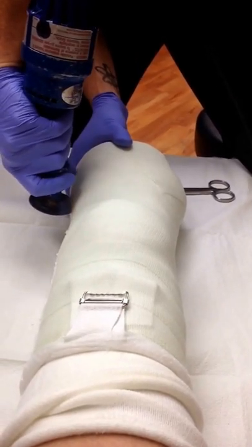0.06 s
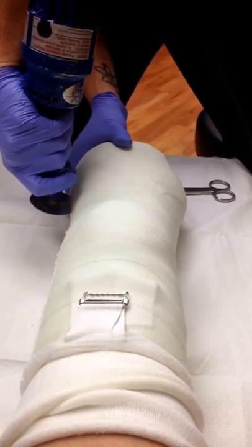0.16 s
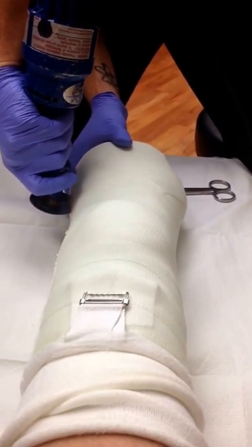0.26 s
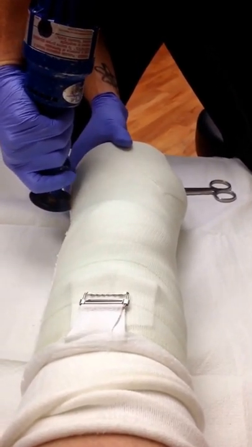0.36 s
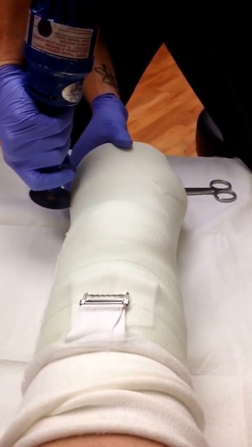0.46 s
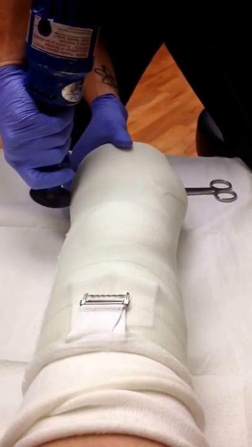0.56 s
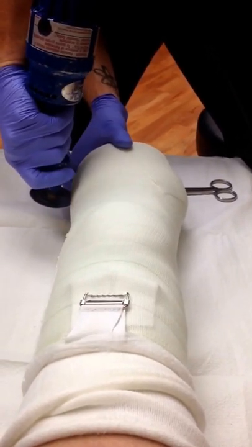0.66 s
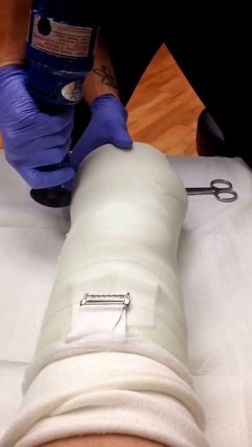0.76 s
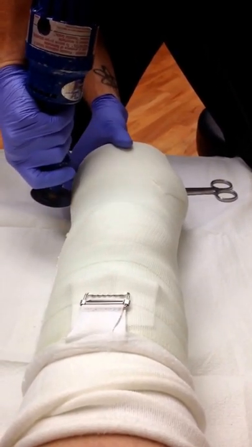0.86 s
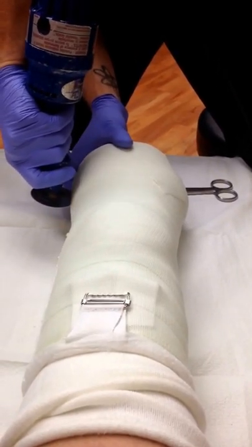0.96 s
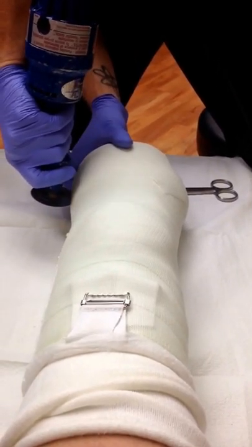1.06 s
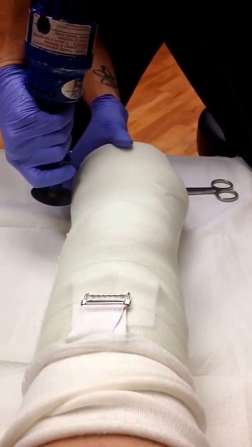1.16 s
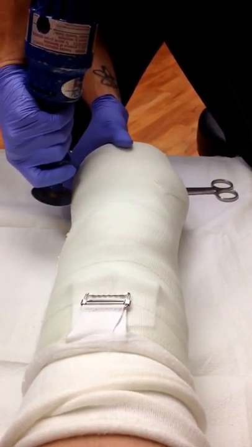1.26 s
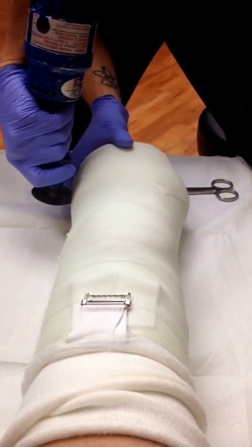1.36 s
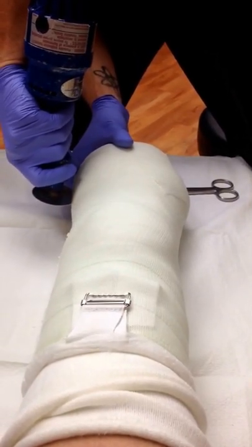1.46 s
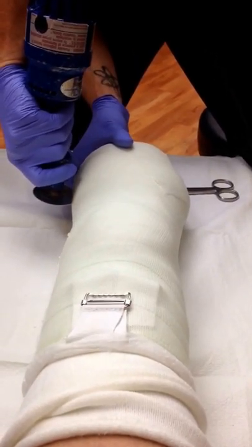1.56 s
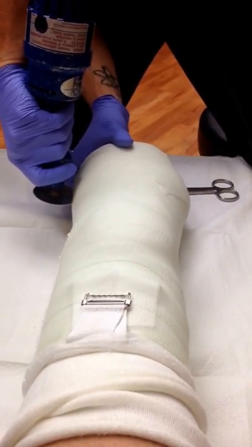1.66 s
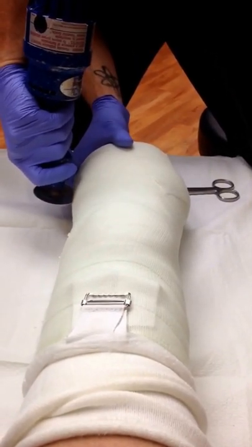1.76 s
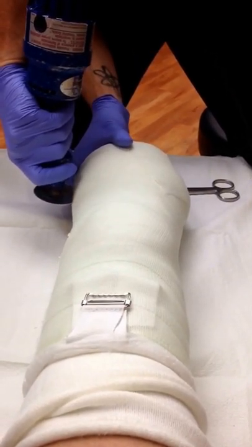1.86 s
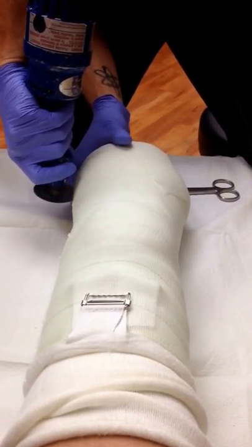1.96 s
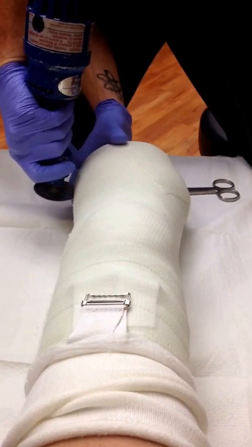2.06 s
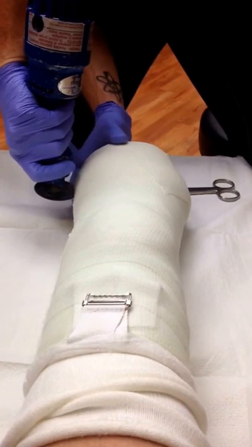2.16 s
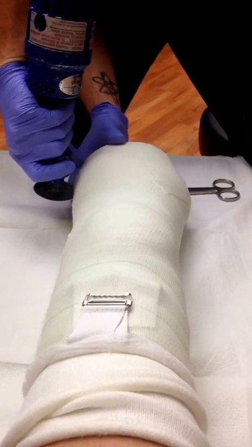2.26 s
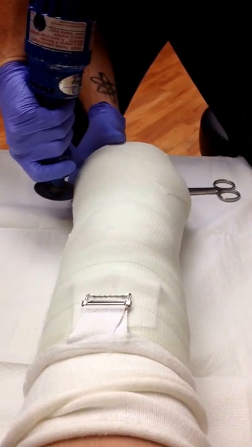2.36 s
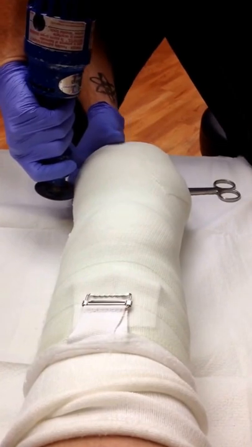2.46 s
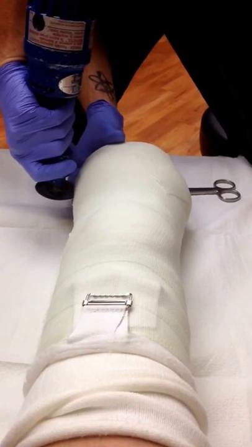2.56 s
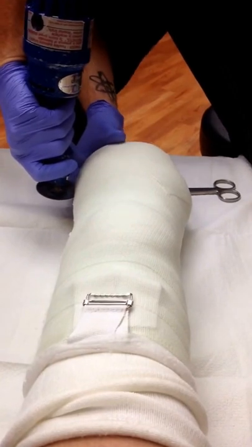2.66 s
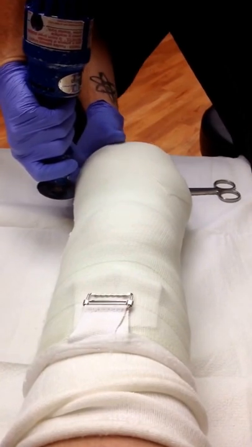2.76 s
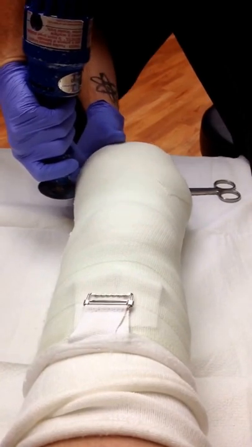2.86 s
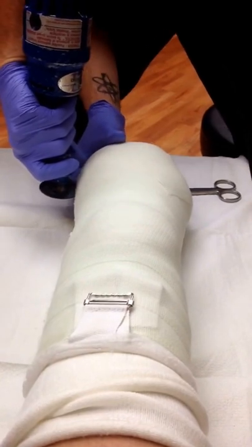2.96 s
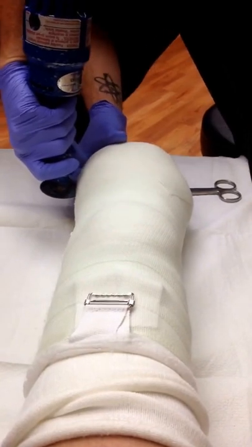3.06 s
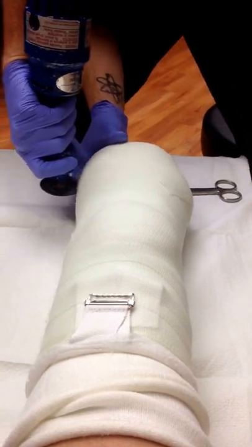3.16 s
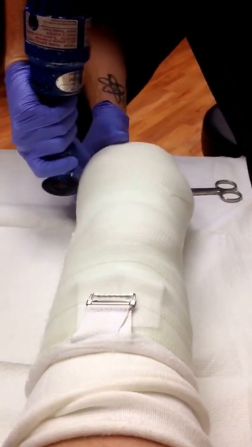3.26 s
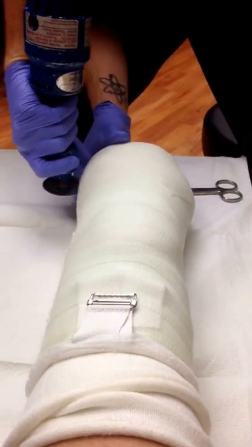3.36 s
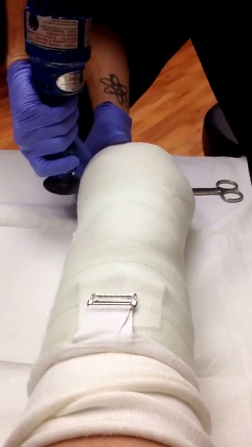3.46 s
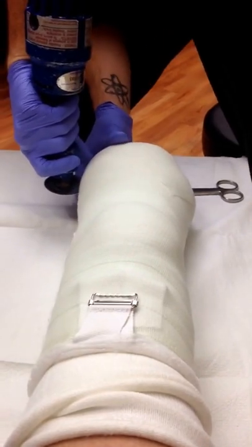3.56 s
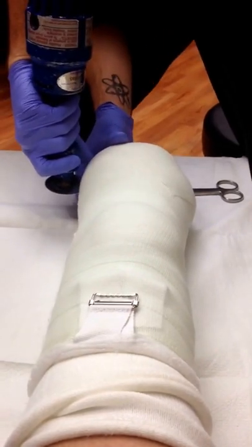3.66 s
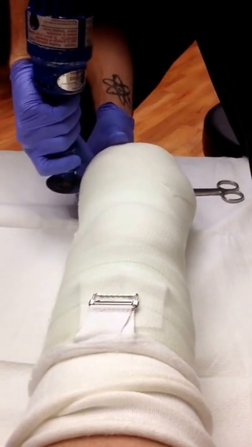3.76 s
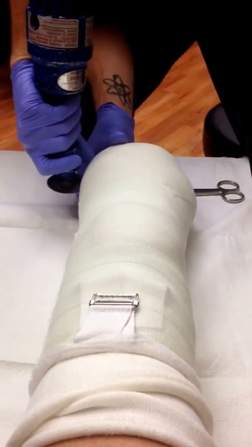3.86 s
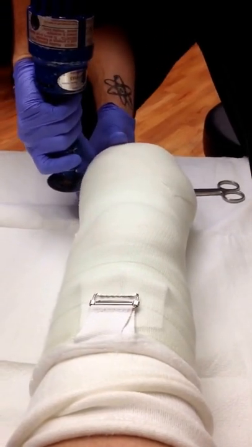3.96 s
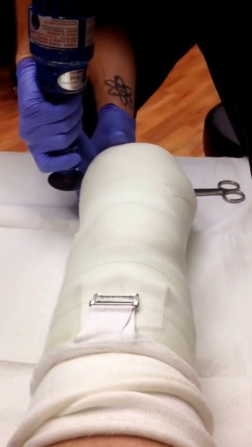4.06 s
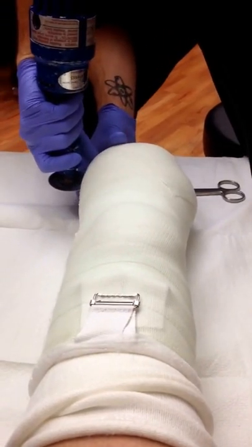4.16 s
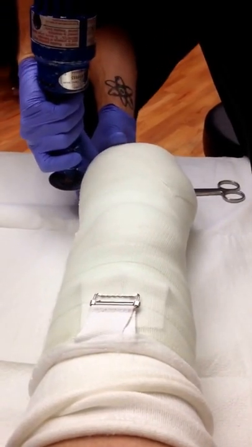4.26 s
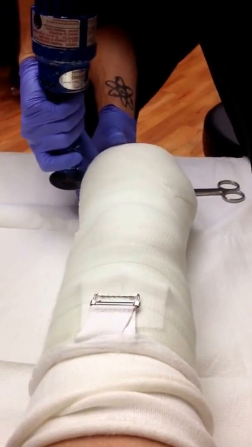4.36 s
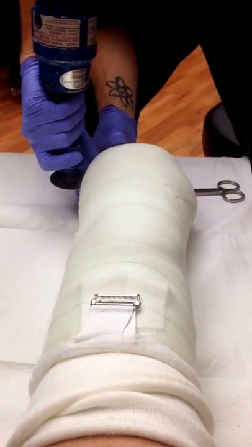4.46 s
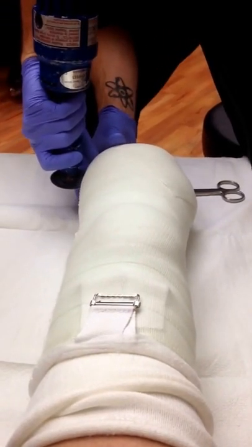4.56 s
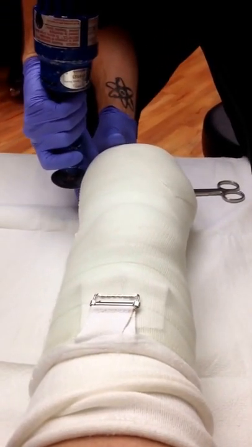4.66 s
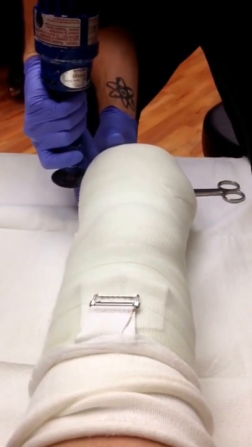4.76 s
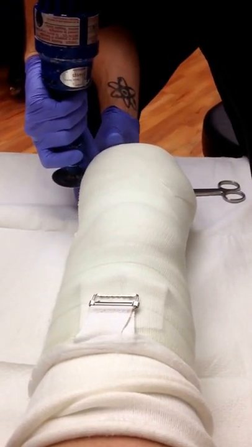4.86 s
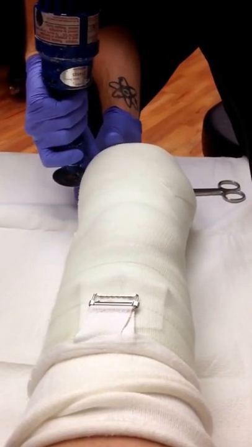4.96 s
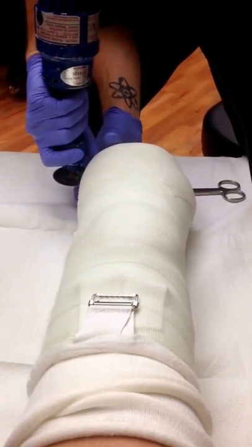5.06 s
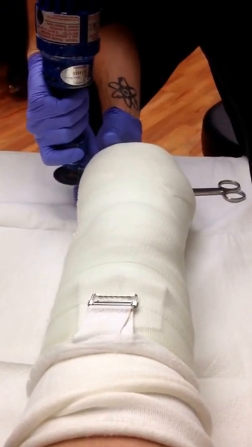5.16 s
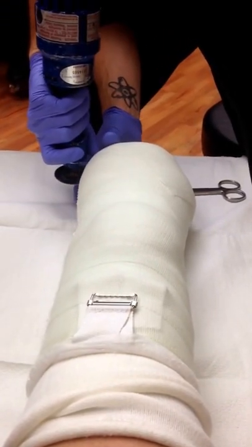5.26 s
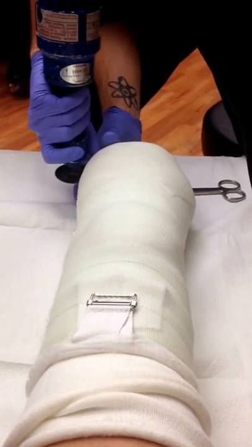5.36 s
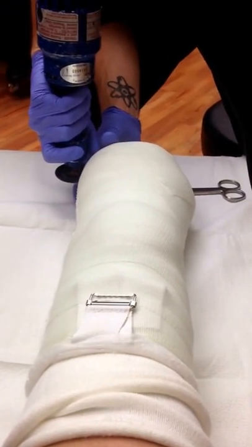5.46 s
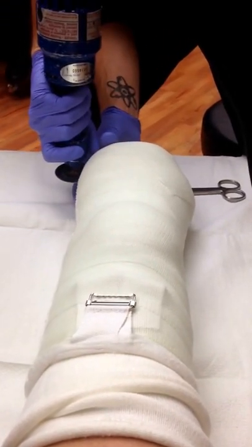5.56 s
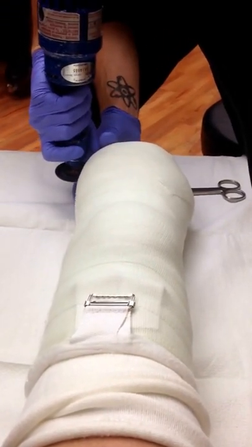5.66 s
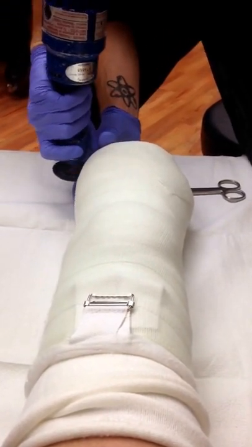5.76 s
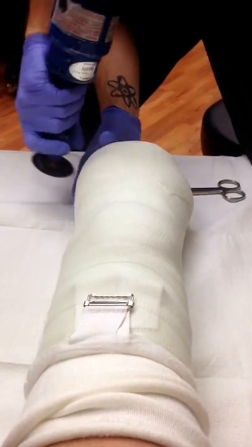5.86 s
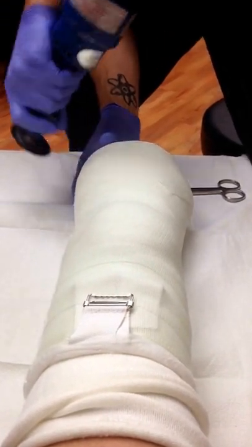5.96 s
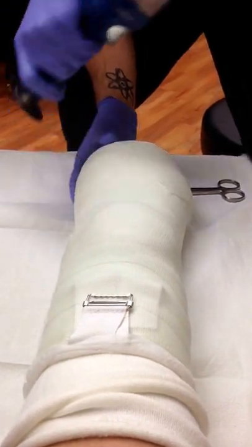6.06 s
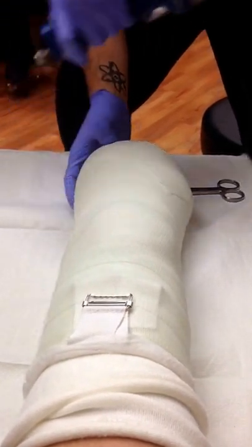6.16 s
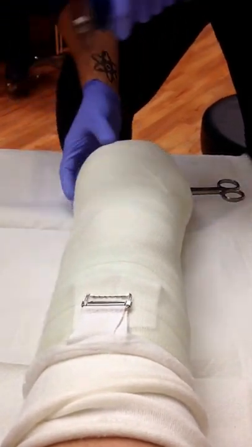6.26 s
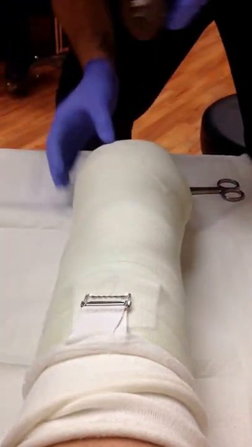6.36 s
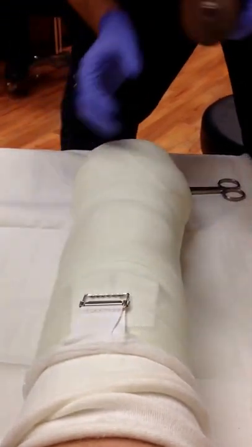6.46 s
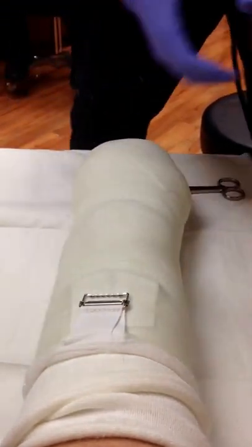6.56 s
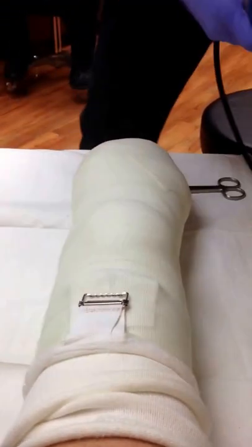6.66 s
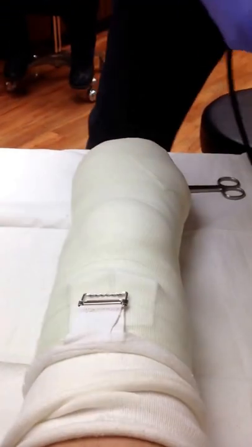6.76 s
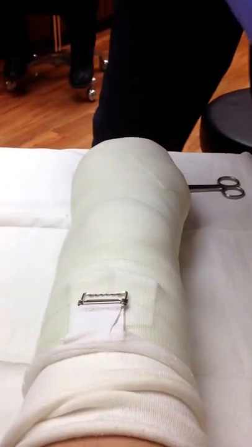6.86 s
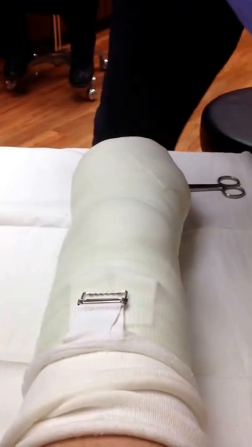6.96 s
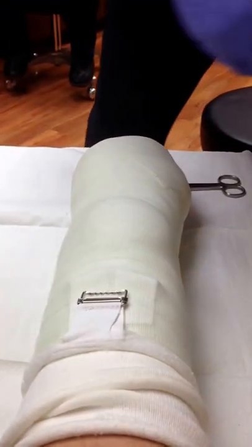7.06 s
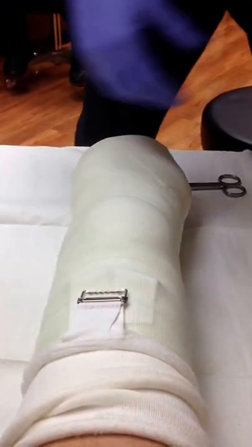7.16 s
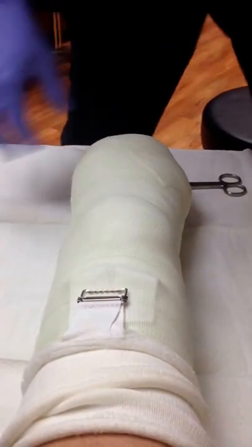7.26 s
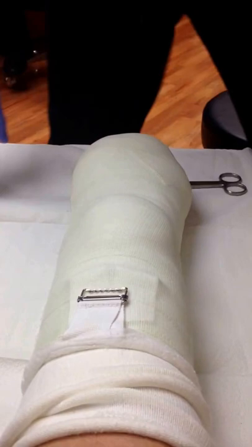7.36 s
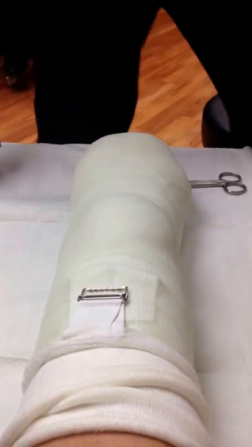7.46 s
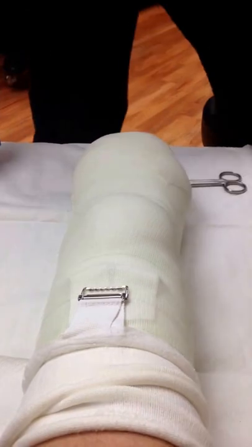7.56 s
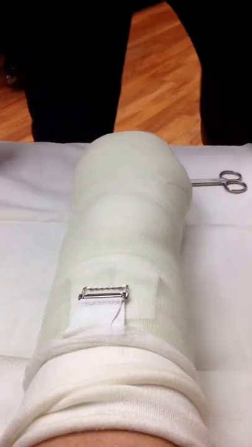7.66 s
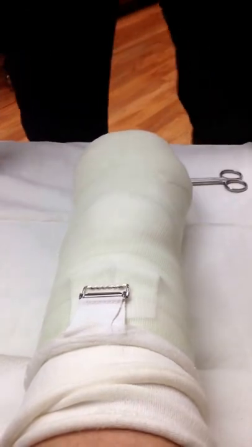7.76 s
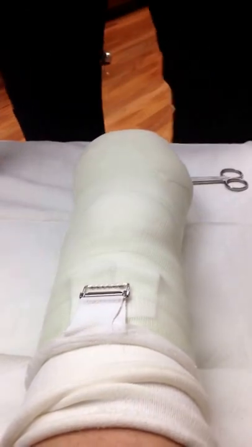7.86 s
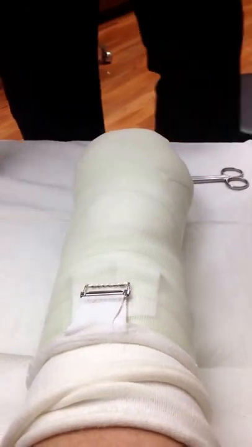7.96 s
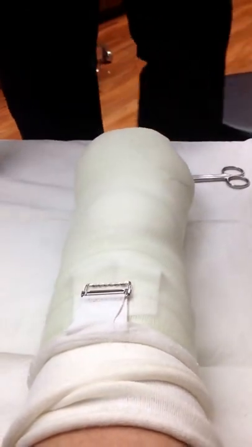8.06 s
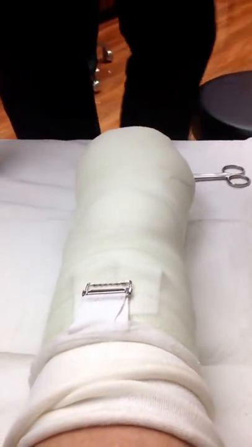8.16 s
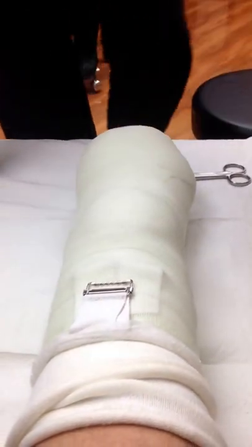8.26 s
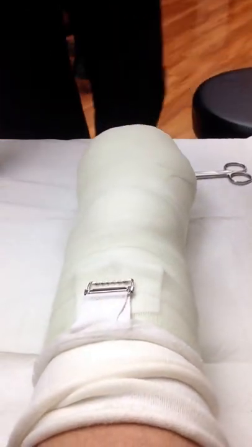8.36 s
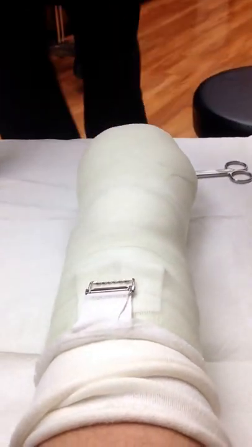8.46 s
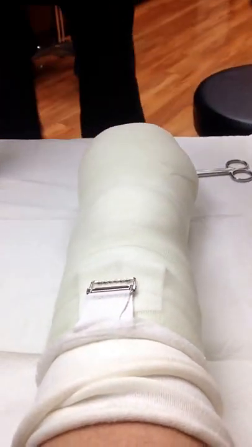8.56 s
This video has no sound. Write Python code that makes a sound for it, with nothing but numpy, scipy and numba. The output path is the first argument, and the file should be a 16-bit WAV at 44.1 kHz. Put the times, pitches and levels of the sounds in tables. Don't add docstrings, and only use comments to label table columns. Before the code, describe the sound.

The sound starts mid-cut, with an electric oscillating saw close to the microphone in a small room. From 0 to about 1 second the harsh, rattling buzz sags in pitch as the blade bites, and the hard cast booms hollowly beneath it. From 1 to 5.8 seconds it grinds on, pitch wavering slightly down and up, with gritty hiss and fine casing rattle. Brief slips near 2.1, 3.3 and 4.1 seconds weaken the boom; short snags near 0.9 and 4.6 make the whine flare. At about 5.8 the blade lifts out: pitch sweeps up within half a second, the low boom drops away, and a brighter whine emerges. From 6.2 to the end at about 8.6 seconds it runs free, nearly steady, with fan hiss and metallic ringing that surges and fades. Faint low thuds fall around 6.4 to 7, 7.75 and 8.4 seconds, over barely audible mains hum.

```python
import sys
import numpy as np
from scipy import signal
from scipy.fft import rfft, irfft, next_fast_len
from scipy.io import wavfile
from scipy.ndimage import uniform_filter1d
from numba import njit

SR = 44100
rng = np.random.default_rng(int(sys.argv[2]) if len(sys.argv) > 2 else 0)


def pcm_store(signal):
    levels = np.round(np.clip(np.atleast_2d(signal), -1, 1) * 32767)
    wavfile.write(sys.argv[1], SR, levels.astype(np.int16).T)


def volts_from_db(level):
    exponent = np.asarray(level, float) / 20
    return 10 ** exponent


N = 379242
T = np.arange(N) / SR
C = T[::32]

# [t/s, f/Hz]
LOADED = [(0.0, 270.8), (0.31, 258.5), (0.49, 264), (0.7, 259), (1.1, 239), (1.59, 230.8), (1.93, 232.1),
          (2.28, 248.5), (2.68, 248), (2.88, 243), (3.15, 230.6), (3.37, 235.9), (3.95, 236), (4.29, 247.2),
          (4.88, 248.4), (5.34, 244), (5.58, 246.5), (5.84, 256.6)]
LIFT_S, IDLE_HZ, RUN_UP_S, CREEP_S, CREEP_SHARE = 5.84, 317.6, .34, 1.4, .055
# [t/s, pressure on cast level/dB, housing level/dB]
GRIP = [(0, -3.5, -22), (.3, 0.5, -20.5), (.9, 1, -20.5), (1.2, -2, -20), (1.55, -1.5, -20.5),
        (2, -5, -21.5), (2.35, -4.5, -18.5), (3.2, -3.5, -20.5), (3.9, -10, -22.5), (4.3, -1.5, -19),
        (5, 0.5, -19), (5.4, -2, -17), (5.8, -1, -18.5), (6.3, -1, -18.5), (6.9, 4, -23.5), (7.5, 6, -19),
        (8.2, 4, -18), (8.6, 2.5, -21.5)]
# [order, level/dB]
BITE = [(1, -4), (2, -4), (3, -3), (4, -1.5), (5, -4.5), (6, -11), (7, -5.5), (8, -2), (9, -0.5), (10, 0),
        (11, -2), (12, -1.5), (13, -17), (14, -4), (15, -10), (16, -6), (17, -19), (18, -21), (19, -23),
        (20, -19), (21, -13), (22, -23), (23, -32), (24, -11)]
# [order, level/dB]
LONG_CUT = [(1, 2.5), (2, -2), (3, 0), (4, -4.5), (5, -6), (6, -5.5), (7, -3), (8, -3.5), (9, -3.5),
            (10, -2), (11, -5), (12, -3.5), (13, -5), (14, -6), (15, -3), (16, -7), (17, -9), (18, -6.5),
            (19, -11.5), (20, -26.5), (21, -12.5), (22, -28), (23, -8), (24, -14)]
# [order, level/dB]
LAST_CUT = [(1, -5.5), (2, -7), (3, 4), (4, -6), (5, -8), (6, -8), (7, -2), (8, -6.5), (9, -3.5),
            (10, -0.5), (11, -6.5), (12, -14.5), (13, -9.5), (14, -12), (15, -9), (16, -10), (17, -8.5),
            (18, -14), (19, -17.5), (20, -25), (21, -13), (22, -11.5), (23, -18), (24, -53)]
# [order, level/dB]
RUN_UP = [(1, -24.5), (2, -27), (3, -9.5), (4, -14.5), (5, -6), (6, -6.5), (7, -8.5), (8, -11.5), (9, -5),
          (10, -7.5), (11, -3), (12, -5), (13, -2), (14, -7), (15, -3.5), (16, -10), (17, 0), (18, -38.5),
          (19, -18), (20, -7), (21, -7), (22, -29), (23, -3), (24, -8)]
# [order, level/dB]
FREE = [(1, -19), (2, -22.5), (3, -9), (4, -10.5), (5, -3), (6, -8.5), (7, -4), (8, -9.5), (9, 0.5),
        (10, -4.5), (11, -6.5), (12, -9.5), (13, -3), (14, -6), (15, 0.5), (16, -5), (17, -7), (18, -10),
        (19, -17), (20, -8), (21, -18), (22, -3), (23, -25), (24, -41)]
# [start t/s, end t/s]
CHANGES = [
    (.7, 0.97),
    (4.05, 4.28),
    (5.84, 5.95),
    (7.2, 7.53),
]
# [t/s, order, level/dB, length t/s]
SWELLS = [(0.32, 2, -20, 0.12), (1.66, 1, 3.5, 0.2), (4.24, 2, -4, 0.36), (5.0, 3, 2.5, 0.1),
          (5.72, 3, 6, 0.18), (7.35, 3, 7.5, 0.14), (5.17, 5, 9.5, 0.12), (7, 5, 10, 0.34),
          (8.2, 5, 5.5, 0.15), (4.46, 6, 11.5, 0.35), (0.98, 7, 6.5, .1), (2.36, 7, 4, 0.14),
          (4.4, 7, 5, 0.13), (8.25, 7, 3, 0.2), (7.42, 9, -10, 0.43), (0.082, 10, 7, 0.067),
          (2.15, 10, 4.5, .1), (2.3, 11, 8, 0.093), (2.3, 12, 4, 0.24), (6.18, 13, 10, 0.092),
          (6.2, 1, 6.5, 0.17), (7.86, 3, -18, 0.16), (7.77, 7, -20, 0.12), (5.7, 6, 4, 0.14),
          (8.1, 16, 7, 0.34), (6.25, 11, 5, 0.085), (1.45, 17, 11, .05), (5.8, 7, -11, 0.077),
          (5.14, 10, 3, 0.18), (7.3, 11, 6.5, 0.16)]
# [t/s, level/dB, length t/s]
SLIPS = [
    (.45, -4, .07),
    (2.08, -11, .05),
    (3.28, -14, .035),
    (4.07, -13, .05),
    (4.75, -5, .12),
]
# [t/s, level/dB, length t/s]
SNAGS = [
    (.9, 5.5, .05),
    (1.42, 2.5, 0.068),
    (2.32, 1, .05),
    (4.62, 6.5, 0.019),
    (4.88, 3.5, 0.029),
]
# [t/s, chatter 0-1]
CHATTER = [(0, .7), (1, .55), (2, .65), (2.2, .3), (2.85, .35), (3, .8), (4.1, .75), (4.3, .45), (5.8, .5),
           (6.1, .35), (8.6, .3)]
EDGE_DB, EDGE_DULL_DB = -13, -24
# [f/Hz, level/dB per Hz]
CUT_HISS = [(30, -34), (180, -48), (330, -10), (520, -12.5), (700, -4.5), (1000, 4), (1500, -2.5),
            (3000, 2.5), (5000, 0.5), (7000, -2), (9000, -3.5), (11500, -7), (13300, -3), (15300, -16)]
# [f/Hz, level/dB per Hz]
FREE_HISS = [(30, -29), (100, -24.5), (250, -16.5), (500, -12), (800, 3.5), (1200, 1), (2500, -1),
             (3800, 0), (5000, 8.5), (6000, -4.5), (7000, 1), (9000, 3), (11200, -16), (14500, -2)]
HISS_DB, GRIT_DB = -23, 4.5
# [f/Hz, width f/Hz, level/dB]
CASING = [(6790, 200, -5), (7140, 90, -7), (8960, 98, -12.5), (10550, 140, -13.5), (11070, 60, -17.5),
          (13400, 90, -12), (14700, 250, -8)]
# [f/Hz, width f/Hz, level/dB]
BLADE = [
    [(4610, 55, 0)],
    [(4970, 60, 0), (5200, 60, -2)],
    [(6250, 25, 0), (5950, 36, -12)],
    [(5110, 50, 0)],
    [(13000, 150, 0)],
    [(13680, 170, 0), (14050, 120, -1)],
]
# [free level/dB, share of its control it follows]
VOICING = [(-21.5, 0.94), (-24, 1.1), (-28, 1.03), (-19.5, 0.68), (-22.5, 0.76), (-21.5, 0.82)]
# [t/s, level/dB]
DISC = [(0, -11), (.3, -20), (5.75, -26), (5.9, -9), (6.3, -6.5), (6.5, 1.5), (6.9, -0.5), (7.3, -5.5),
        (7.5, 1.5), (7.75, -29), (8.6, -3)]
# [t/s, level/dB]
AIM = [(0, -9), (.3, -12), (.46, -5.5), (.9, -22), (5.8, -20), (5.9, -4), (6.05, 1), (6.25, -10),
       (6.4, 5.5), (6.58, -5), (6.75, 3.5), (7.12, 1), (7.26, -7), (7.44, -3), (7.72, -15), (8.6, -12.5)]
# [t/s, peak level/dB, f/Hz, t60 t/s]
THUDS = [
    (6.381, -37, 106.9, 0.19),
    (6.711, -43, 97.7, 0.18),
    (6.793, -42, 103, 0.35),
    (6.9, -43, 88.8, 0.2),
    (6.989, -39, 115.7, 0.18),
    (7.75, -38, 129.6, 0.24),
    (8.429, -34, 125, 0.16),
]
HUM_HZ, HUM_DB = 122, -72
MIC_LOW_HZ, TOP_HZ = 42, 15300


def level(x):
    return x / np.sqrt(np.mean(x ** 2))


def curves(table):
    s, *columns = np.transpose(table)
    return [np.interp(C, s, c) for c in columns]


def fine(x):
    return np.interp(T, C, x)


def bumps(table):
    return sum(db * np.exp(-((C - s) / length) ** 2) for s, db, length in table)


def walk(rate):
    k = int(len(C) / T[-1] / rate)
    steps = np.repeat(rng.standard_normal(len(C) // k + 1), k)
    for _ in range(3):
        steps = uniform_filter1d(steps, k)
    return 1.577 * steps[:len(C)]


def ring(x, hz, width):
    return signal.lfilter(*signal.iirpeak(hz, hz / width, fs=SR), x)


@njit
def stack(phase, first, gains, hop):
    out = np.zeros(len(phase))
    for i in range(len(phase)):
        j = min(i // hop, gains.shape[0] - 2)
        a = i / hop - j
        z = np.exp(1j * phase[i])
        p = np.exp(1j * first * phase[i])
        for k in range(gains.shape[1]):
            out[i] += (p * (gains[j, k] + a * (gains[j + 1, k] - gains[j, k]))).real
            p *= z
    return out


def comb(phase, order_db, sway, chatter):
    gains = []
    for k, db in order_db:
        slow, quick = (walk(rate) + 1j * walk(rate) for rate in (5, 42))
        rough = chatter * (1 + (k / 22) ** 3)
        motion = 1 + sway * slow + rough * quick
        gain = volts_from_db(db) * motion / np.sqrt(1 + 2 * sway ** 2 + 2 * rough ** 2)
        gains.append(gain * np.exp(1j * rng.uniform(0, 2 * np.pi)))
    return np.sqrt(2) * stack(phase, order_db[0][0], np.array(gains).T.copy(), 32)


def stroke_hz():
    loaded = uniform_filter1d(curves(LOADED)[0], size=90, mode="nearest")
    t = np.clip(C - LIFT_S, 0, None)
    lag = (1 - CREEP_SHARE) * np.exp(-t / RUN_UP_S) + CREEP_SHARE * np.exp(-t / CREEP_S)
    return IDLE_HZ - (IDLE_HZ - loaded) * lag


def orders(first, last, db):
    patterns = np.repeat([BITE, LONG_CUT, LAST_CUT, RUN_UP, FREE], 2, axis=0)[1:-1, :, 1]
    rows = []
    for k in range(first, last + 1):
        swell = bumps([(s, swell_db, length) for s, order, swell_db, length in SWELLS if round(order) == k])
        rows.append((k, db + swell + np.interp(C, np.ravel(CHANGES), patterns[:, k - 1])))
    return rows


def shell(phase, db):
    rows = [(k, level_db + bumps(SLIPS) / k) for k, level_db in orders(1, 3, db)]
    return comb(phase, rows, sway=.08, chatter=.05)


def whine(phase, db, chatter, glide, free):
    low = comb(phase, orders(4, 10, db), sway=.2, chatter=.7 * chatter + glide / 90)
    high = comb(phase, orders(11, 24, db - glide / 22), sway=.4, chatter=chatter + glide / 50)
    edge_db = db + EDGE_DB + EDGE_DULL_DB * (chatter + free)
    edge = comb(phase, [(k, edge_db) for k in range(25, 45)], sway=.8, chatter=.08)
    return low + high + edge


def hiss(phase, free):
    size = next_fast_len(N)
    octave = np.log2(np.arange(1, size // 2 + 2) * SR / size)
    white = rfft(rng.standard_normal(size))
    out = np.zeros(N)
    for centre in np.arange(4.6, 14.2, 1 / 3):
        band = irfft(white * np.clip(1 - 3 * abs(octave - centre), 0, 1), size)[:N]
        cut, idle = (np.interp(centre, np.log2(hz), db) for hz, db in map(np.transpose, (CUT_HISS, FREE_HISS)))
        flicker_db = .8 * walk(7) + 1.32 * walk(26)
        out += fine(volts_from_db(cut + free * (idle - cut) + flicker_db)) * band
    return out * (1 + 0.14 * np.cos(phase))


def casing(phase):
    grit = rng.standard_normal(N) * (1 + 0.89 * np.cos(phase))
    out = np.zeros(N)
    for hz, width, db in CASING:
        out += fine(volts_from_db(db + 1.5 * walk(17))) * level(ring(grit, hz, width))
    return volts_from_db(-30.5) * level(out)


def blade(phase, glide):
    rows = [(k, -glide / 14) for k in range(13, 24)]
    strokes = level(comb(phase, rows, sway=.3, chatter=.2 + glide / 120))
    pulse = 1 + .5 * np.cos(phase)
    controls = 3 * curves(DISC) + 3 * curves(AIM)
    out = np.zeros(N)
    for modes, (db, share), control in zip(BLADE, VOICING, controls):
        tone = np.zeros(N)
        for hz, width, mode_db in modes:
            drive = volts_from_db(-2.0) * strokes + pulse * rng.standard_normal(N)
            mode = ring(ring(drive, hz, width), hz, 6 * width)
            tone += fine(volts_from_db(mode_db + 2.5 * walk(22))) * mode
        out += fine(volts_from_db(db + share * control)) * level(tone)
    return out


def thuds():
    out, t = np.zeros(N), T[:SR // 2]
    for s, db, hz, t60 in THUDS:
        shape = (1 - np.exp(-t / 0.012)) * np.exp(-np.log(1000) * t / t60)
        low = level(ring(rng.standard_normal(len(t)), hz, 40))
        puff = level(ring(rng.standard_normal(len(t)), 5 * hz, 400))
        part = out[int(s * SR):][:len(t)]
        part += (volts_from_db(db) * shape * (low + .5 * puff))[:len(part)]
    return out


def hum():
    return volts_from_db(HUM_DB) * level(ring(ring(rng.standard_normal(N), HUM_HZ, 23), HUM_HZ, 38))


def scene():
    hz = stroke_hz()
    press_db, housing_db = curves(GRIP)
    phase = 2 * np.pi * np.cumsum(fine(hz * (1 + 0.00082 * walk(30)))) / SR
    free = np.interp(C, CHANGES[2], (0, 1))
    chatter = curves(CHATTER)[0] - bumps(SLIPS) / 28
    glide = uniform_filter1d(abs(np.gradient(hz, C)), size=125)
    boom = shell(phase, press_db - 29.5)
    saw = whine(phase, housing_db - 8.5 + bumps(SNAGS), chatter, glide, free)
    saw += fine(volts_from_db(HISS_DB + GRIT_DB * chatter)) * hiss(phase, free)
    mix = boom + saw + casing(phase) + blade(phase, glide) + thuds() + hum()
    return np.tile(mix, (2, 1))


def thin_treble(x):
    hz, _, bins = signal.stft(x, SR, "cosine", nperseg=2048)
    around = np.exp(uniform_filter1d(np.log(abs(bins) + 1e-12), size=40, axis=0))
    bar_db = np.interp(hz, (3000, 5500, 9500, 13500, 15000), (-14, -4.5, -2.5, -2, 0))[:, None]
    smooth = uniform_filter1d(abs(bins), size=5, axis=0)
    kept = bins * (smooth > volts_from_db(bar_db) * around)
    return signal.istft(kept, SR, "cosine", nperseg=2048)[1][:N]


def side_puffs():
    side, size = np.zeros(N), 2048
    for s, hz in rng.uniform((.8, 5000), (8.5, 14500), (22, 2)):
        band = signal.butter(4, (hz - 700, hz + 700), "band", fs=SR, output="sos")
        fill = signal.sosfilt(band, rng.standard_normal(size))
        side[int(s * SR):][:size] += volts_from_db(-17 - hz / 1200) * fill * np.sin(np.pi * np.arange(size) / size)
    return side


def band_limit(x):
    return signal.sosfilt(signal.butter(12, 15330, fs=SR, output="sos"), x)


def record(dry):
    side = side_puffs()
    rounded = np.tanh(.8 * dry[0]) / .8
    bass_cut = signal.butter(3, MIC_LOW_HZ, "high", fs=SR, output="sos")
    mid = signal.sosfilt(bass_cut, thin_treble(rounded))
    size = next_fast_len(N)
    spectrum = rfft(mid + np.array([side, -side]), size)
    spectrum[:, int(TOP_HZ * size / SR):] = 0
    return band_limit(irfft(spectrum, size)[:, :N])


dry = scene()
out = record(dry)
pcm_store(out)
```